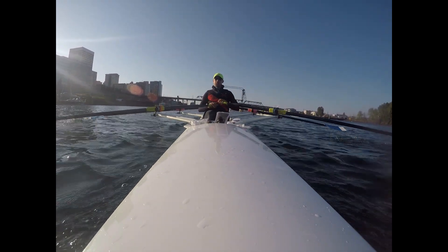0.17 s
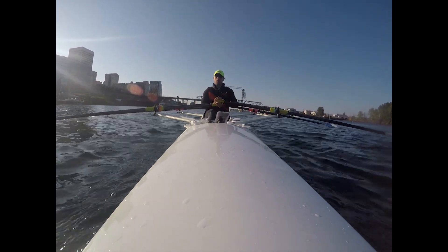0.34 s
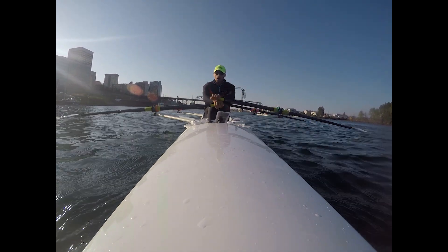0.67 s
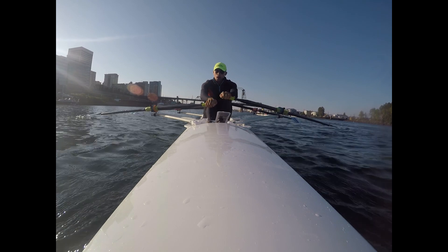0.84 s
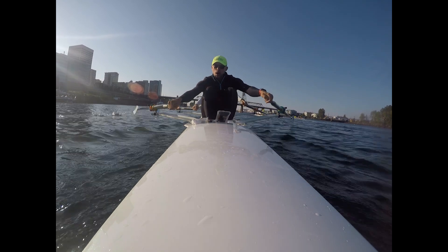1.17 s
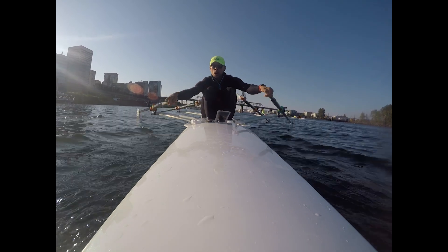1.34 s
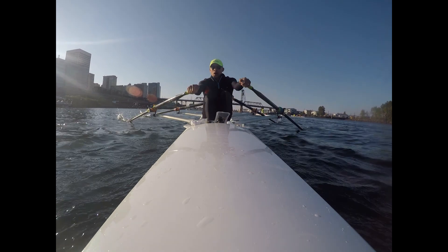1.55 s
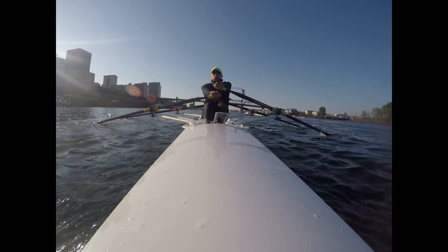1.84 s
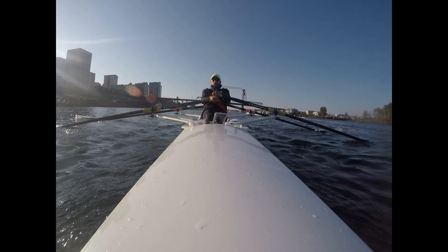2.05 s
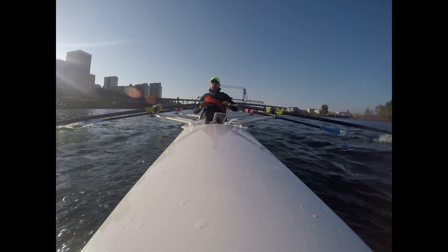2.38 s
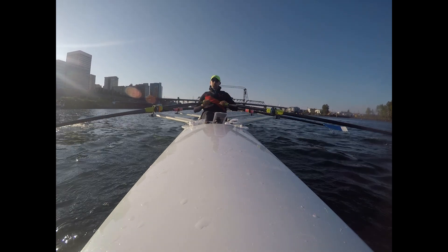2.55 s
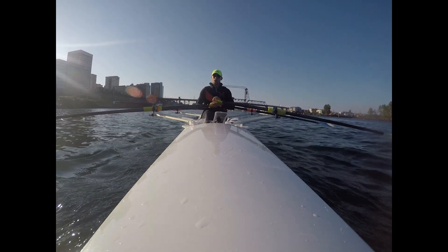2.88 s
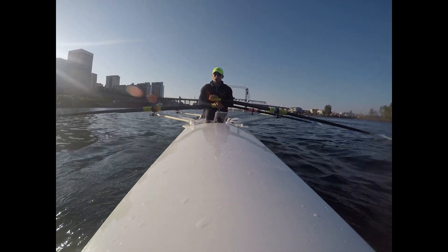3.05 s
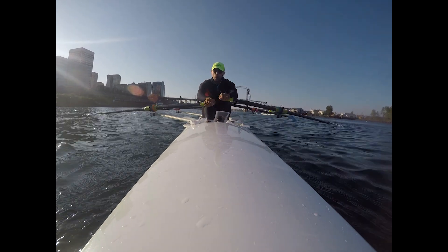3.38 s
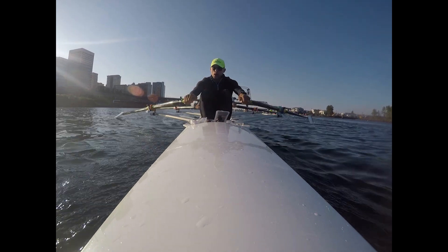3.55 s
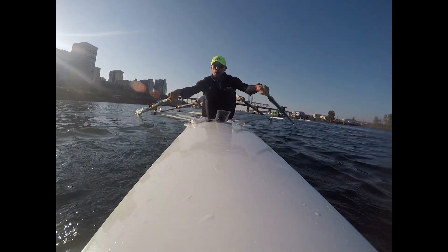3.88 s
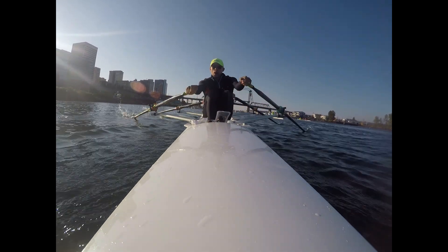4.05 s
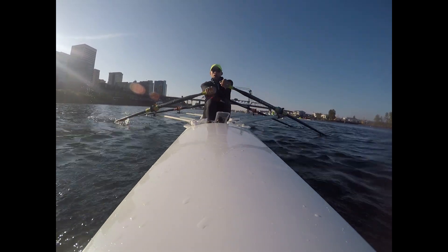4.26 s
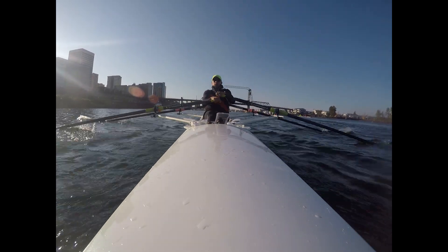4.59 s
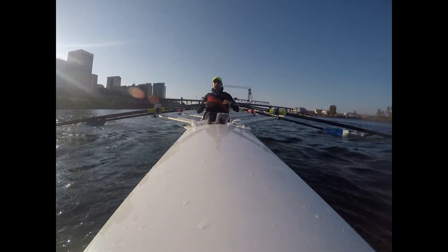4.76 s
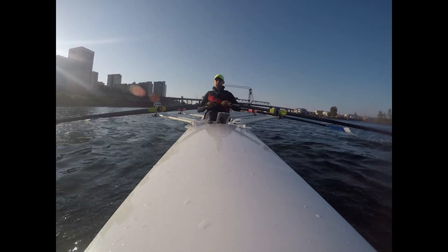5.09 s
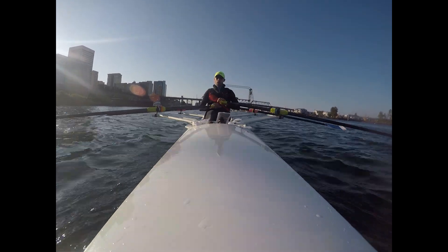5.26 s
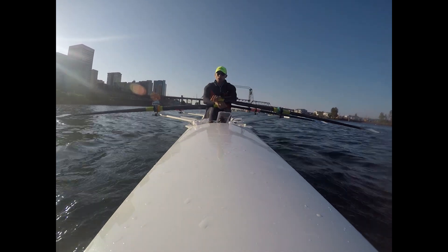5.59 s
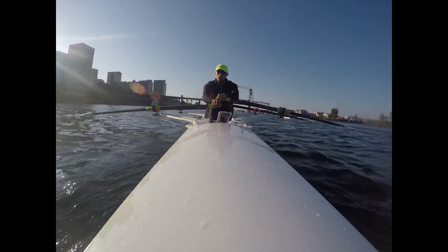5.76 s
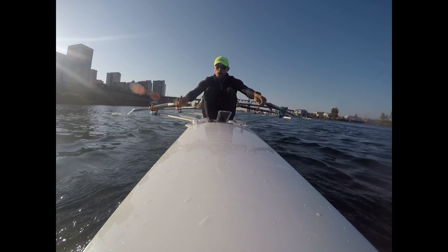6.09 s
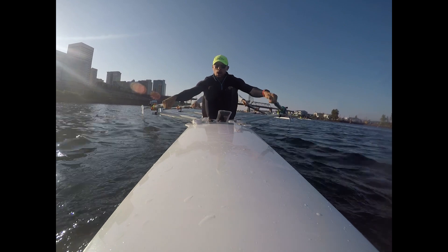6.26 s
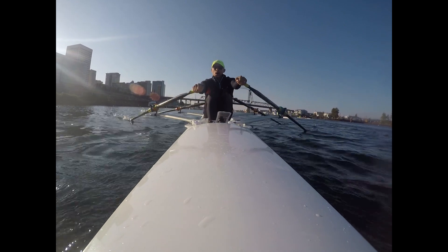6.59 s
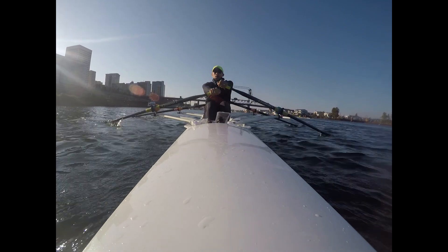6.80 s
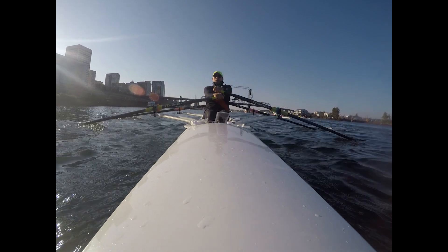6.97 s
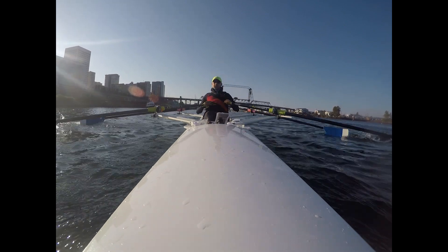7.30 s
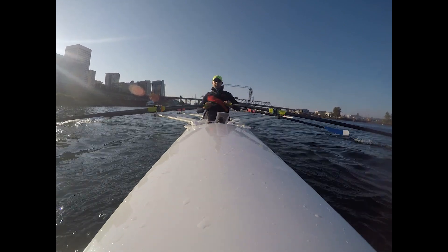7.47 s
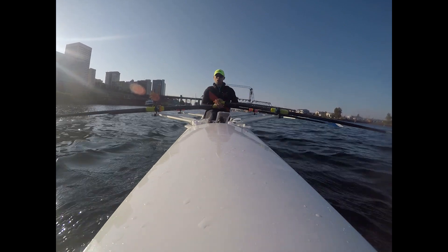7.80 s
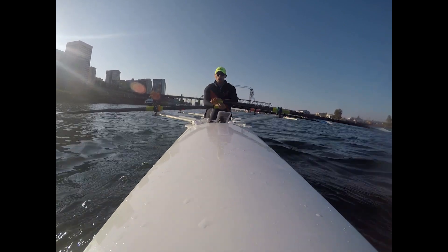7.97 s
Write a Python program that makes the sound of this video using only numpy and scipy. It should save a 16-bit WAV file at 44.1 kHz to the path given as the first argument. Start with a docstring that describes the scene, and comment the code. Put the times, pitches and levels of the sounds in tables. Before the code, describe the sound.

Outdoors on open water, but muffled and close, as if inside a hollow box. It opens on the tail of a strong surge, then calms into low rumble and gurgling. Oar and seat knocks, water slaps and clicks then arrive in uneven bursts at each catch and finish, with sparse spray ticks, plopping air pockets and a slight housing rattle. Mono, bass-heavy, dull on top.

```python
"""A microphone in a closed housing on the deck of a rowing shell hears mostly through the hull.
The end of a surge opens over a flexing shell, rushing water and seat wheels hissing on rails: driven noise.
Spray soon ticks, air pockets plop, and slaps and knocks of oars and seats ring the same hull modes as the water.
Then oarlocks and seats click and the housing rattles; water and knocks swell around each end of the stroke."""
import sys
import numpy as np
from scipy import signal
from scipy.io import wavfile
from scipy.ndimage import uniform_filter1d, minimum_filter1d

SR = 44100
rng = np.random.default_rng(int(sys.argv[2]) if len(sys.argv) > 2 else 0)


def natural_amplitude(level_db):
    """Convert a level in decibels to a linear amplitude factor, elementwise."""
    exponent = np.asarray(level_db, float) / 20
    return 10 ** exponent


def to_wav(s):
    """Save 16-bit WAV."""
    ch = np.atleast_2d(s).T  # columns
    pcm = np.round(np.clip(ch, -1, 1) * 32767)  # PCM
    wavfile.write(sys.argv[1], SR, pcm.astype(np.int16))


N = 358974

# long hollow body modes: f/Hz, width/Hz, relative level/dB
BODY_MODES = [(67, 15, -3.5), (108.4, 23.6, 1), (140.5, 18.1, 2), (206.9, 26.7, -5)]
# modes of the chamber under the deck: f/Hz, width/Hz, relative level/dB
CHAMBER_MODES = [(252, 56, -5.5), (323.3, 25, -10.5), (400, 51, -10.5), (439.6, 75, -7.5),
                 (510.5, 45.5, -8.5), (558, 68, -21.5)]
# deck panel modes: f/Hz, width/Hz, relative level/dB
PANEL_MODES = [(710, 160, -9), (885, 110, -5), (1035, 118, -4), (1130, 63, -4.5), (1325, 81, -6),
               (1501, 84, -7), (1647, 163, -8.5), (2010, 150, -17), (2144, 60, -14.5), (2410, 430, -23.5),
               (2926, 200, -15.5), (3160, 190, -14.5), (3650, 840, -26.5), (4040, 46, -25)]
# housing modes: f/Hz, width/Hz, relative level/dB
HOUSING_MODES = [(4270, 170, -9), (4764, 130, 4.5), (5600, 570, -14), (6400, 290, -5.5), (8650, 270, -7.5)]
# broad resonances of the air path through the housing: f/Hz, width/Hz, relative level/dB
AIR_PATH_MODES = [(5900, 900, 2.5), (8050, 2500, -5), (9940, 1700, -2.5), (12200, 2000, -13)]


def rms_one(x):
    """Scale to unit power."""
    return x / np.sqrt(np.mean(x ** 2) + 1e-20)


def drift(rate_hz):
    """Slow random wander with spread 1: noise through two equal poles at rate_hz."""
    hop = 40   # samples per slow step
    r = np.exp(-2 * np.pi * rate_hz * hop / SR)
    noise = rng.standard_normal(N // hop + 2002)
    slow = signal.lfilter([1], [1, -2 * r, r * r], noise)[2000:]   # filter settled
    return np.interp(np.arange(N) / hop, np.arange(len(slow)), rms_one(slow))


def resonate(x, hz, width_hz):
    """Two-pole mode, gain 1 on top, falling steeply above."""
    r, w = np.exp(-np.pi * width_hz / SR), 2 * np.pi * hz / SR
    top = (1 - r) * np.sqrt(1 - 2 * r * np.cos(2 * w) + r * r)
    return signal.lfilter([top], [1, -2 * r * np.cos(w), r * r], x + 1e-18)


def rush(modes, shared_db, own_db, rate_hz, grain_db):
    """Turbulence drives each mode, in gusts that all modes share and patches of its own; rms 1."""
    grain = natural_amplitude(grain_db * np.minimum(rng.exponential(1, N), 5))   # small impacts of uneven size
    gusts = natural_amplitude(shared_db * drift(rate_hz))
    push = rng.standard_normal((2, N)) * grain * gusts
    flow = 0
    for k, (hz, width_hz, db) in enumerate(modes):
        sign = (-1) ** (k // 2)
        patches = natural_amplitude(db + own_db * drift(rate_hz))
        flow = flow + sign * patches * resonate(push[k % 2], hz, width_hz)
    return rms_one(flow)


def struck(modes, times_s, strengths_db, burst_s, spread_db, click_db, rise_s):
    """Each blow is a click and a swelling, dying noise burst; it gives every mode an energy of its own."""
    t = np.arange(int(0.2 * SR)) / SR
    shape = np.exp(-t / burst_s) * (1 - np.exp(-t / rise_s))
    luck_db = spread_db * rng.standard_normal((len(times_s), len(modes)))
    push = shape * rng.standard_normal((len(times_s), len(t)))
    push[:, 0] = natural_amplitude(click_db)
    push_energy = np.sum(shape ** 2) + natural_amplitude(click_db) ** 2
    blows = 0
    for k, (hz, width_hz, db) in enumerate(modes):
        ring = resonate(push, hz, width_hz)
        impulse_ring = resonate(signal.unit_impulse(len(t)), hz, width_hz)
        usual_energy = push_energy * np.sum(impulse_ring ** 2)
        even_out = np.sqrt(usual_energy / np.sum(ring ** 2, axis=1))
        size = natural_amplitude(strengths_db(hz) + db + luck_db[:, k]) * even_out
        blows = blows + (-1) ** k * size[:, None] * ring
    out = np.zeros(N + len(t))
    starts = np.round(np.array(times_s) * SR).astype(int)
    np.add.at(out, starts[:, None] + np.arange(len(t)), blows)
    return out[:N]


def soften(x, cut_hz):
    """A yielding contact passes little above its cut."""
    return signal.sosfilt(signal.butter(2, cut_hz, fs=SR, output="sos"), x)


def stroke():
    """Surge/dB, share of the way from one surge to the next, and seat wheel level/dB."""
    # stroke ends, catch or finish: surge start/s, seats stop/s, surge end/s, surge/dB, fastest wheels/dB
    stroke_ends = [(-0.3, -0.104, 0.0087, 15, -66), (0.958, 1.12, 1.32, 7, -67.5),
                   (2.212, 2.379, 2.59, 9.5, -65.5), (3.59, 3.706, 3.85, 7.5, -67.5),
                   (4.699, 4.883, 5.06, 11, -63), (5.96, 6.164, 6.28, 7.5, -68.5),
                   (7.204, 7.364, 7.44, 8, -63.5), (8.45, 8.6, 8.7, 10, -65.5)]
    surge_rise_s, surge_fall_s, eases_after_s = 0.08, 0.057, 0.035
    rest_db, brake_db, wheels_stop_s = -72, 1.5, 0.008
    t = np.arange(N) / SR
    start, stop, end, peak_db, fastest_db = np.transpose(stroke_ends)
    surge_db = 0
    for a, b, db in zip(start, end, peak_db):
        surge_db = surge_db + db * np.interp(t, [a - surge_rise_s, a, b, b + surge_fall_s], [0, 1, 1, 0])
    # 0 after a surge, 1 at the next start, held until shortly after the seats stop
    low_s = end + surge_fall_s
    full_s = np.r_[start[1:], 99]
    ease_s = np.r_[stop[1:] + eases_after_s, 100]
    way = np.interp(t, np.ravel([low_s, full_s, ease_s], "F"), np.tile([0, 1, 1], len(end)))
    coming = np.searchsorted(stop, t)
    run = (t - stop[coming - 1]) / (stop[coming] - stop[coming - 1])
    # the hiss swells further just before the seats stop
    wheels_db = rest_db + (fastest_db[coming] - rest_db) * run + brake_db * run ** 9.0
    return surge_db, way, uniform_filter1d(wheels_db, size=int(wheels_stop_s * SR))


def flexing():
    """The shell bends in a low rumble whose swing is evened out."""
    # whole-shell bending modes: f/Hz, width/Hz, relative level/dB
    bending_modes = [(27.6, 6.7, -2.5), (50.7, 10.7, -0.5)]
    # flexing of the whole shell: t/s, level/dB
    flex_levels = [(0.0, -7.5), (0.45, -23), (0.88, -18.5), (1.38, -9.5), (1.43, -16), (1.49, -14.5),
                   (1.84, -20.5), (2.63, -11.5), (2.72, -16.5), (2.79, -12.5), (3.04, -21.5), (3.11, -12.5),
                   (3.58, -17.5), (3.63, -12), (4.4, -17), (4.44, -23.5), (4.85, -8.5), (5.71, -24),
                   (5.98, -10), (6.91, -21), (7.64, -13), (8.14, -20.5)]
    x = rush(bending_modes, shared_db=3.5, own_db=0.5, rate_hz=3.5, grain_db=-0.9)
    swing = np.sqrt(uniform_filter1d(x ** 2, size=2600) + 0.02)
    s, db = np.transpose(flex_levels)
    return natural_amplitude(np.interp(np.arange(N) / SR, s, db)) * rms_one(x / swing ** 0.7)


def water_gain(surge_db, way, low_db, build_db, surge_share):
    """Water layer gain: builds up between surges and takes a share of each surge."""
    return natural_amplitude(low_db + build_db * way + surge_share * surge_db)


def deep_water(surge_db, way):
    """Water rushing by drives the long hollow body."""
    flow = rush(BODY_MODES, shared_db=0.36, own_db=2.0, rate_hz=10.0, grain_db=1.6)
    return water_gain(surge_db, way, low_db=-25, build_db=3.68, surge_share=0.78) * flow


def hollow_water(surge_db, way):
    """Water rushing by drives the chamber under the deck."""
    flow = rush(CHAMBER_MODES, shared_db=1.5, own_db=1.5, rate_hz=32.0, grain_db=0.0)
    return water_gain(surge_db, way, low_db=-35, build_db=6.7, surge_share=0.64) * flow


def gurgles(per_s):
    """Air pockets plop against the skin; each swells and dies in one lower panel mode; rms 1."""
    happens = rng.random(N) < per_s / SR
    sizes = natural_amplitude(1.9 * np.minimum(rng.exponential(1, N), 3)) * happens
    lower = PANEL_MODES[:9]
    dealt = rng.integers(0, len(lower), N)
    out = 0
    for k, (hz, width_hz, db) in enumerate(lower):
        swell = resonate(sizes * (dealt == k), hz, width_hz)
        out = out + natural_amplitude(db) * resonate(swell, hz, width_hz)
    return rms_one(out)


def ripples(surge_db, way):
    """Ripples and gurgles drive the panels; the housing shakes with this skin."""
    lower = rush(PANEL_MODES[:9], shared_db=0.5, own_db=1.0, rate_hz=22.0, grain_db=2.0)
    upper = rush(PANEL_MODES[9:], shared_db=1.7, own_db=1.3, rate_hz=37.0, grain_db=1.5)
    skin = natural_amplitude(-1.5) * lower + natural_amplitude(-5.0) * gurgles(per_s=190.0) + natural_amplitude(-12.5) * upper
    buzz = natural_amplitude(-32.0) * rush(HOUSING_MODES, shared_db=4.0, own_db=0.8, rate_hz=34.0, grain_db=3.0)
    return water_gain(surge_db, way, low_db=-43.5, build_db=8.12, surge_share=0.13) * (skin + buzz)


def seat_wheels(wheels_db):
    """Wheels hiss on their rails: noise through the air path, louder as the seats speed up."""
    return natural_amplitude(wheels_db) * rush(AIR_PATH_MODES, shared_db=0.0, own_db=1.5, rate_hz=30.0, grain_db=1.0)


def spray():
    """Drops tick on the deck, thin and short."""
    # spray on the deck: t/s, relative level/dB, tilt/(dB per octave)
    spray_ticks = [(0.2129, -54, -5), (0.3027, -57, -1), (1.037, -42.5, 0), (1.1702, -58, -7),
                   (1.3478, -53, -3), (1.4187, -52, 0.5), (2.3027, -51, 3), (2.3324, -53, -0.5),
                   (2.4044, -58, -2.5), (2.5294, -49.5, -4), (2.7267, -49, -2.5), (3.0465, -51, -4),
                   (3.5754, -58, 0), (3.915, -50, -5), (4.8164, -54, -6), (5.7014, -54, -4),
                   (6.0023, -48, -3), (6.3974, -47.5, 0.5), (7.2888, -48, -5), (7.3154, -55, 0),
                   (7.358, -49, -4), (7.466, -54, -3)]
    s, level_db, tilt_db = np.transpose(spray_ticks)
    return struck(AIR_PATH_MODES, s, lambda hz: level_db + 3.5 + tilt_db * np.log2(hz / 7500),
                  burst_s=0.0085, spread_db=2.0, click_db=-4.5, rise_s=0.0019)


def plops():
    """Water shakes an air pocket at the skin; each plop swells and dies raggedly around one pitch."""
    # single plops: t/s, peak/dB, f/Hz
    single_plops = [(0.343, -36, 710), (0.442, -29, 1130), (0.67, -32, 1060), (0.746, -26, 1130),
                    (0.782, -29, 1025), (0.896, -29, 1326), (1.125, -22, 960), (1.251, -31, 1290),
                    (1.431, -33, 850), (1.635, -31.5, 1105), (1.808, -30, 990), (2.092, -33, 775),
                    (2.302, -16, 940), (2.364, -21, 1480), (2.411, -24, 1320), (2.44, -29, 1310),
                    (2.893, -36, 2010), (3.04, -44, 2110), (3.11, -39, 2060), (3.152, -34.5, 3225),
                    (3.182, -24, 1130), (3.344, -24, 1100), (3.386, -36, 1120), (3.463, -26.5, 1003),
                    (3.524, -33, 824), (3.609, -22, 883), (3.701, -21, 930), (3.726, -24, 1590),
                    (3.76, -24, 1360), (4.1, -31.5, 996), (4.188, -32, 1340), (4.215, -28.5, 1006),
                    (4.472, -26, 895), (4.815, -26.5, 1340), (4.87, -24, 955), (4.89, -29, 2070),
                    (4.935, -27, 1480), (5.062, -33.5, 1080), (5.184, -34, 1140), (5.19, -37, 2100),
                    (5.26, -37, 2010), (5.451, -30, 1035), (5.702, -30, 980), (5.742, -26, 1680),
                    (5.885, -41, 1060), (6.065, -29, 890), (6.091, -26, 880), (6.198, -17.5, 1300),
                    (6.837, -42, 1060), (6.9, -31, 900), (6.994, -26, 1086), (7.098, -28, 1100),
                    (7.171, -25, 910), (7.224, -16.5, 930), (7.318, -26, 1130), (7.402, -24.5, 1310),
                    (7.724, -40, 890)]
    width_hz, stir_s = 100, 0.0087   # stir: decay of the shaking
    out, length = np.zeros(N), SR // 10
    fade = np.exp(-np.arange(length) / (stir_s * SR))
    for s, peak_db, hz in single_plops:
        stir = signal.unit_impulse(length) + natural_amplitude(-17.0) * fade * rng.standard_normal(length)
        tone = resonate(resonate(stir, hz, width_hz), hz, width_hz)
        start = int(s * SR)
        out[start:start + length] += natural_amplitude(peak_db) * tone / np.abs(tone).max()
    return out


def wavelets(count):
    """Small waves slap at random moments; rows like those of the knocks."""
    mean_db, spread_db = (-39, -31.5, -21), 4.5   # crack, knock, thud
    luck = rng.random((count, 2))
    strengths_db = np.array(mean_db) + spread_db * rng.standard_normal((count, 3))
    return np.c_[luck[:, 0] * (N - 2) / SR, strengths_db, 90 * 2 ** (0.8 * luck[:, 1])]


def knocks():
    """A blow cracks panels and housing, knocks in the chamber, thuds in body modes near its pitch."""
    # oar and seat knocks, louder slaps: t/s, relative levels of crack/dB, knock/dB, thud/dB, thud f/Hz
    oar_knocks = [(0.442, -31, -46, -11, 90), (0.67, -36, -39, -24, 91.5), (0.745, -20, -28, -5.5, 130),
                  (0.964, -22.5, -17.5, -4, 113), (1.052, -18, -14, -8, 123), (1.125, -15.5, -9.5, -4, 93),
                  (1.136, -22, -1, -8.5, 198), (1.167, -20.5, -16, 8, 148), (1.184, -32, -7, -15, 151),
                  (1.205, -29, -15.5, -16, 200), (1.238, -22, -11, -15, 225), (1.252, -26, -19.5, -15, 223),
                  (1.27, -32, -18.5, -19, 202), (1.5, -45, -20, -3, 138), (1.52, -44, -33, -3.5, 141),
                  (1.807, -29.5, -27, -12, 136), (2.175, -23, -17, -33, 122), (2.207, -23, -9.5, -8, 190),
                  (2.3, -14, -11.5, 2, 123), (2.364, -10, -3.5, 4, 215), (2.387, -15, -8, -18, 216),
                  (2.405, -21, -9.5, -21, 218), (2.43, -21, -15.5, 5.5, 208), (2.512, -24, -24, -20, 128),
                  (2.54, -31, -25, -10, 130), (2.722, -39, -20, -16, 110), (2.775, -39, -18.5, -6.5, 108),
                  (3.049, -23, -25, -5, 142), (3.088, -27, -18, -16, 144), (3.183, -25, -23, -12, 112),
                  (3.386, -20.5, -19.5, -23, 113.5), (3.609, -14, -9, 6.5, 209),
                  (3.632, -22, -12.5, 1, 210), (3.655, -22, -17, 3, 210), (3.697, -18.5, -4.5, -10, 213),
                  (3.725, -14.5, -13.5, -15, 200), (3.749, -21, -5.5, 5.5, 187),
                  (3.772, -24, -14.5, -4, 200), (3.86, -43, -30, 1, 114.5), (4.365, -20.5, -13.5, -11, 139),
                  (4.471, -34, -32, -5.5, 199), (4.702, -19.5, -12.5, -12.5, 143),
                  (4.722, -21, -7, -29, 91.5), (4.815, -13, -5, -15, 136), (4.868, -11, -6.5, -4, 109),
                  (4.892, -11, -4, -16, 109), (4.931, -16, -8.5, -13, 121), (4.955, -28, -8, -17, 180),
                  (5.45, -27.5, -39, -32, 101), (5.703, -22.5, -23, -38, 118), (5.735, -19, -34, -29, 128),
                  (5.76, -15.5, -31, -28, 128), (6.019, -40, -32, -7, 190), (6.091, -20, -10, -13, 140),
                  (6.108, -27, -9.5, -15, 200), (6.194, -10, -5.5, -3, 109), (6.217, -16.5, -7, -15, 200),
                  (6.238, -25, -14, -11, 180), (6.262, -27.5, -17, -5.5, 139), (6.435, -40, -29, 0, 132.6),
                  (6.835, -24.5, -22, -30, 146), (7.17, -22, -13.5, 9, 190.6), (7.224, -16, -6, -17, 156),
                  (7.311, -18, -6, -5.5, 107.5), (7.354, -13, 0.5, 10.5, 201),
                  (7.399, -15.5, -7.5, -15, 97), (7.42, -20, -10, -18, 200), (7.46, -30, -15.5, -9.5, 200),
                  (7.726, -20.5, -39, -9, 152), (7.94, -29, -33, -3.5, 113), (8.0, -25, -37, -16, 112)]
    s, crack_db, knock_db, thud_db, thud_hz = np.transpose(np.r_[oar_knocks, wavelets(count=20)])
    crack_hz = 1060 * 2 ** (0.2 * rng.standard_normal(len(s)))
    crack = struck(PANEL_MODES, s, lambda hz: crack_db + 14.0 - 3.2 * np.abs(np.log2(hz / crack_hz)),
                   burst_s=0.017, spread_db=2.5, click_db=14.5, rise_s=0.0013)
    shake = struck(HOUSING_MODES, s, lambda hz: crack_db - 42.0,
                   burst_s=0.018, spread_db=2.0, click_db=1.0, rise_s=0.003)
    knock = struck(CHAMBER_MODES, s, lambda hz: knock_db + 28.5 + 4.8 * np.log2(hz / 450),
                   burst_s=0.014, spread_db=2.5, click_db=20.5, rise_s=0.003)
    thud = struck(BODY_MODES, s, lambda hz: thud_db + 26.0 - 35.7 * np.abs(np.log2(hz / thud_hz)),
                  burst_s=0.02, spread_db=1.9, click_db=18.5, rise_s=0.012)
    return soften(crack, cut_hz=3200) + shake + soften(knock + thud, cut_hz=900)


def clicks():
    """Oarlocks and seats click, short and bright, ringing upper panel modes and the housing."""
    # clicks: t/s, relative level/dB
    lock_clicks = [(0.7058, -40), (0.7607, -36), (0.9827, -29.5), (1.0544, -31.5), (1.1282, -24),
                   (1.1697, -33), (1.2376, -36), (1.2544, -33.5), (1.3039, -46), (1.8797, -42),
                   (2.3491, -28), (2.364, -22.5), (2.5137, -30), (3.0574, -37), (3.1562, -35),
                   (3.5439, -29), (3.6116, -32), (3.7269, -35), (3.7527, -30), (3.9125, -35.5),
                   (4.2931, -31), (4.7292, -26.5), (4.813, -23.5), (4.9365, -28.5), (4.9944, -36),
                   (5.4096, -36), (5.704, -29), (5.7463, -33), (6.067, -35.5), (6.094, -31), (6.1719, -30),
                   (6.1948, -24), (6.2194, -34.5), (6.322, -41), (7.1097, -29.5), (7.2285, -33),
                   (7.3168, -25), (7.356, -24), (7.3971, -26), (7.792, -30.5)]
    s, level_db = np.transpose(lock_clicks)
    panels = struck(PANEL_MODES[7:13], s, lambda hz: level_db + 24.5,
                    burst_s=0.008, spread_db=1.5, click_db=7.5, rise_s=0.0014)
    housing = struck(HOUSING_MODES, s, lambda hz: level_db - 20.0,
                     burst_s=0.015, spread_db=1.5, click_db=1.0, rise_s=0.0013)
    return panels + housing


def rattles():
    """The housing rattles in its mount, ringing its two lowest modes."""
    # rattles: t/s, relative level/dB
    mount_rattles = [(1.052, -47.5), (1.168, -49), (1.241, -45), (1.256, -50.5), (2.525, -45),
                     (3.703, -45.5), (3.727, -49.5), (3.753, -46), (3.77, -47), (4.818, -46),
                     (4.935, -50.5), (4.993, -45.5), (6.195, -43.5), (6.221, -44.5), (7.399, -45.5),
                     (7.418, -45), (7.445, -47)]
    s, level_db = np.transpose(mount_rattles)
    return struck(HOUSING_MODES[:2], s, lambda hz: level_db + 12.0,
                  burst_s=0.0069, spread_db=2.0, click_db=4.5, rise_s=0.0018)


def scene():
    """Sum of all paths into the microphone, one channel."""
    surge_db, way, wheels_db = stroke()
    water = deep_water(surge_db, way) + hollow_water(surge_db, way) + ripples(surge_db, way)
    steady = flexing() + water + seat_wheels(wheels_db)
    events = spray() + plops() + knocks() + clicks() + rattles()
    return (steady + events)[None]


def top_cut(x):
    """Nothing passes above the cut-off."""
    return signal.sosfilt(signal.butter(12, 15000, fs=SR, output="sos"), x)


def record(dry):
    """The lowest rumble is cut and a limiter holds the peaks under its ceiling."""
    ceiling = 0.95
    x = signal.sosfilt(signal.butter(2, 18, "high", fs=SR, output="sos"), dry)
    room_left = np.minimum(1, ceiling / (np.abs(x) + 1e-9))
    gain = uniform_filter1d(minimum_filter1d(room_left, size=441), size=441)   # eases in and out over 10 ms
    return top_cut(x * gain)


dry = scene()
out = record(dry)
to_wav(out)
```